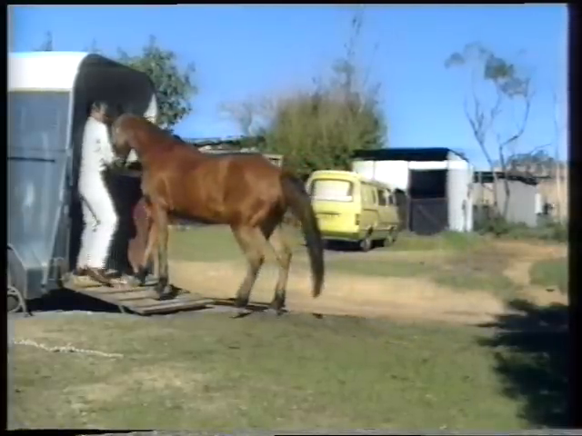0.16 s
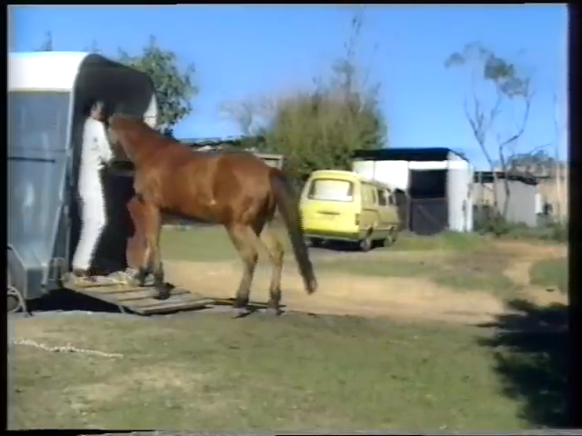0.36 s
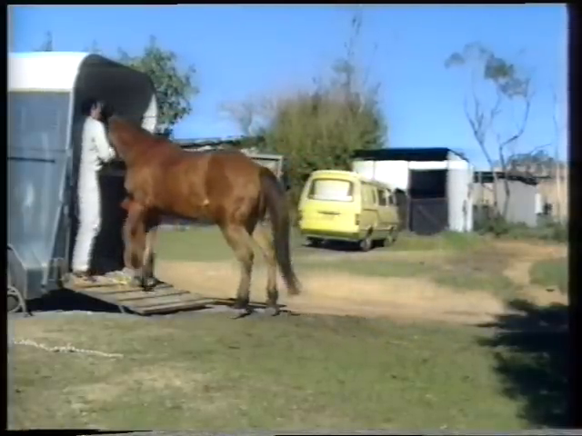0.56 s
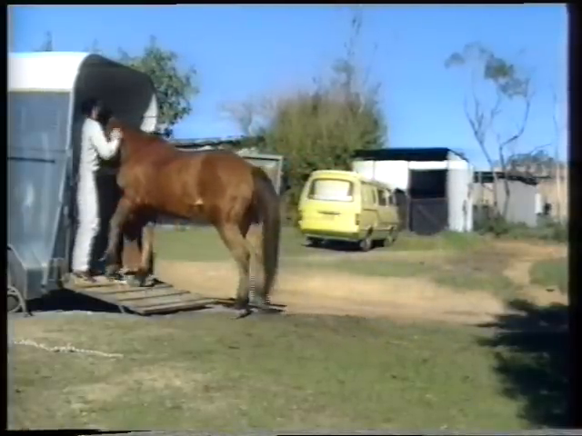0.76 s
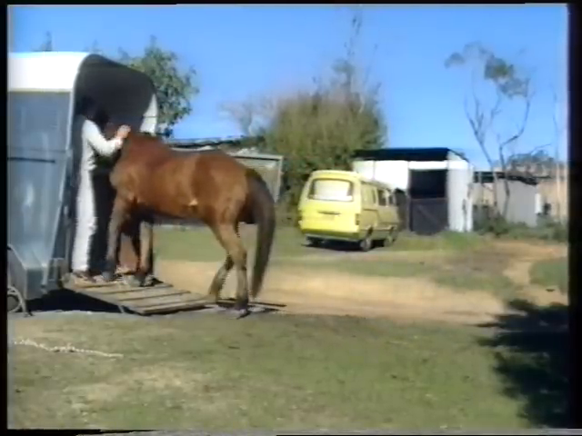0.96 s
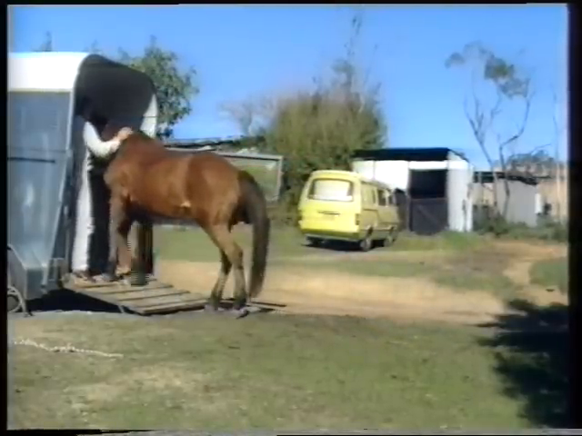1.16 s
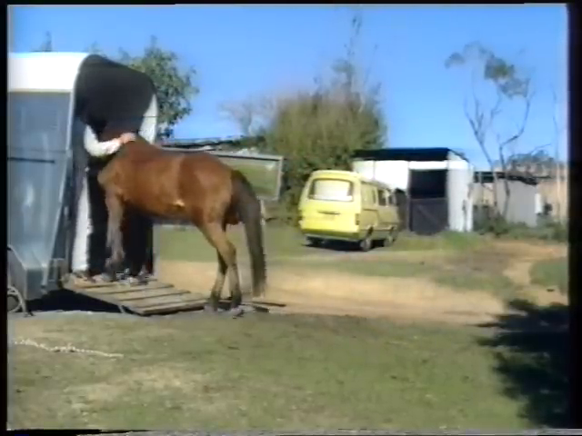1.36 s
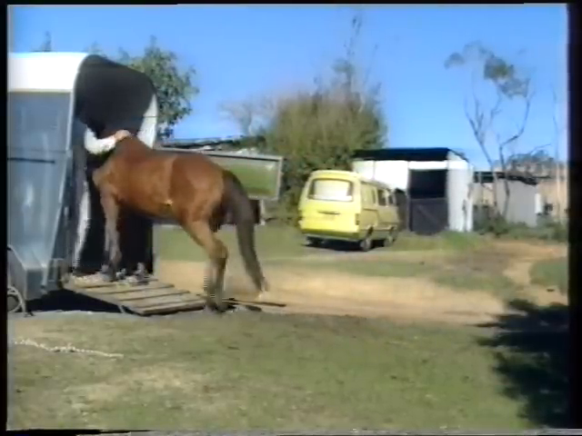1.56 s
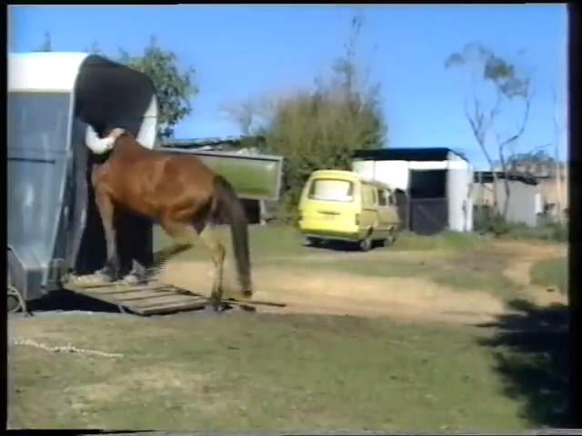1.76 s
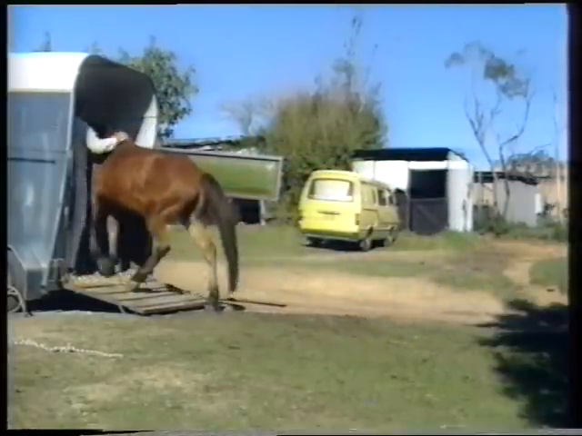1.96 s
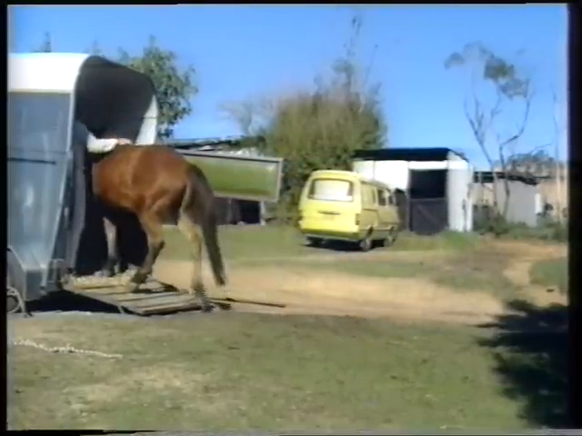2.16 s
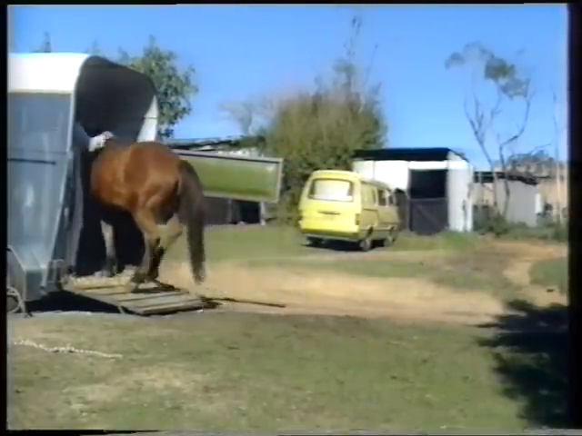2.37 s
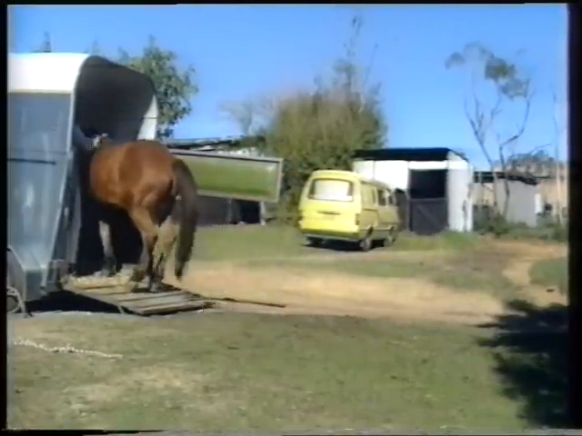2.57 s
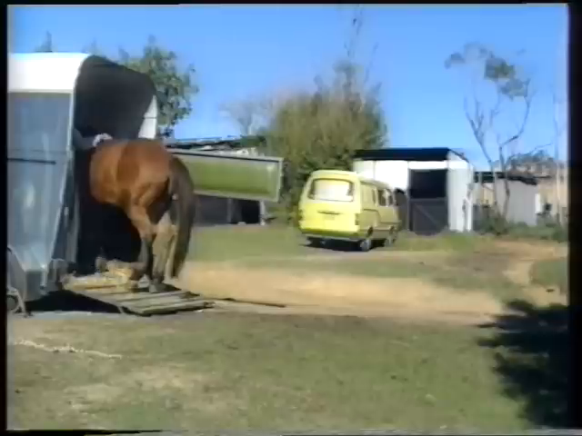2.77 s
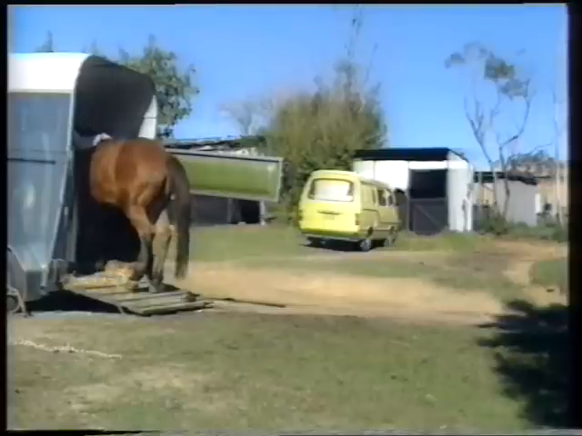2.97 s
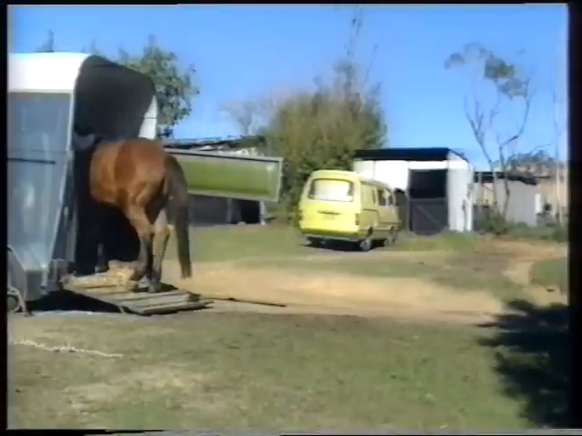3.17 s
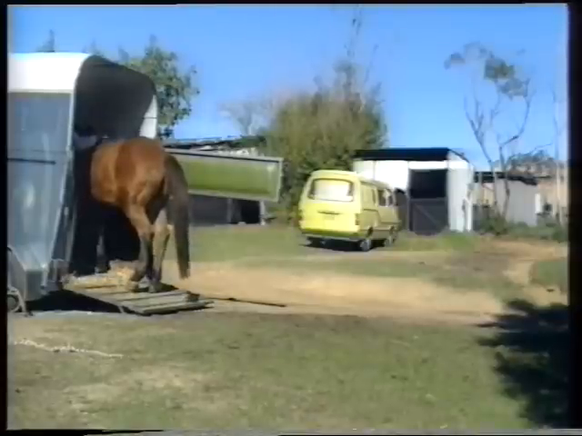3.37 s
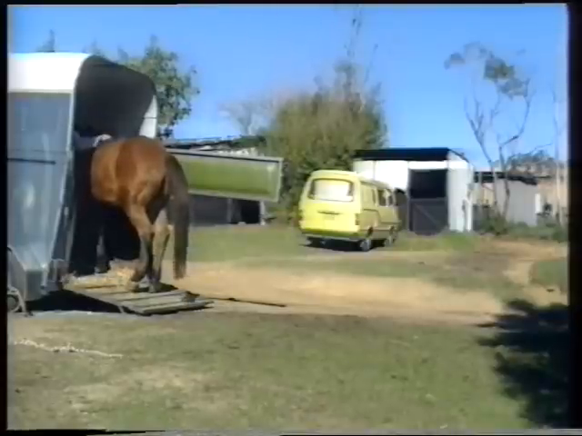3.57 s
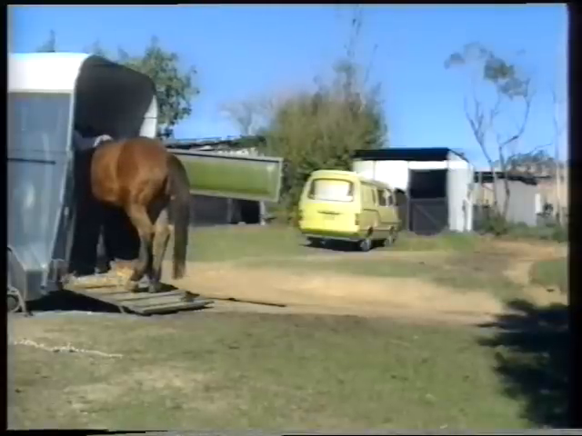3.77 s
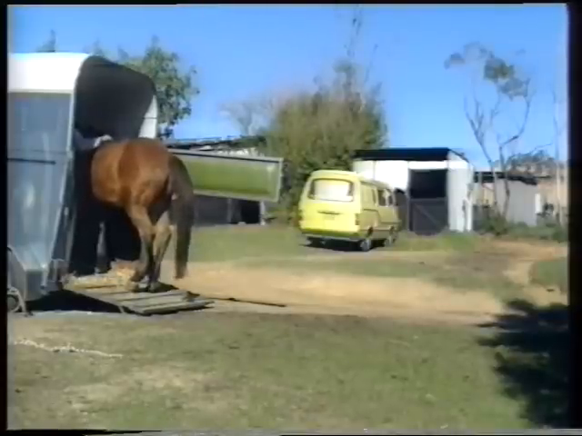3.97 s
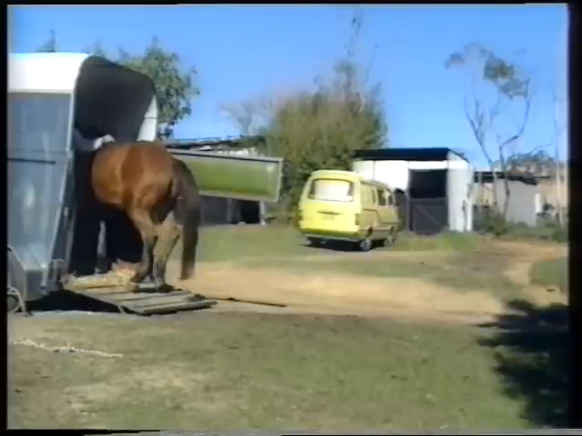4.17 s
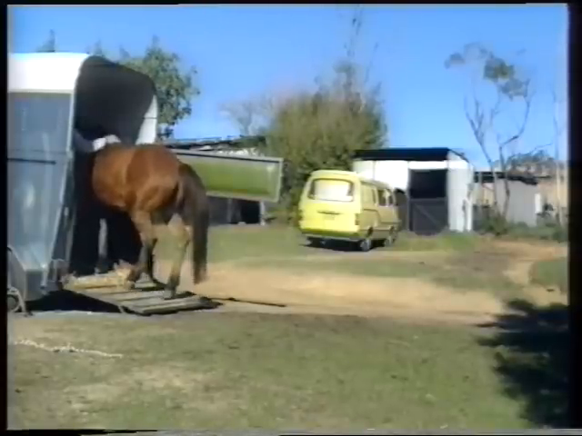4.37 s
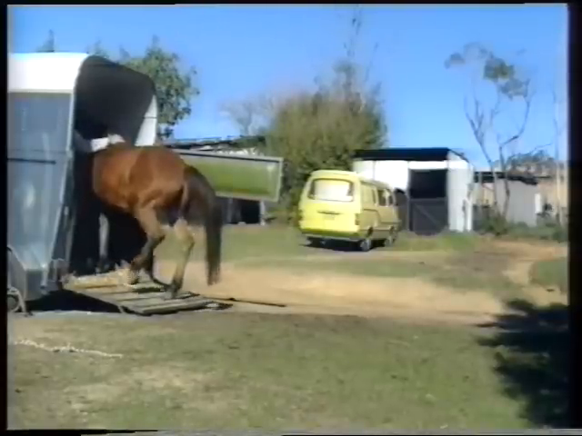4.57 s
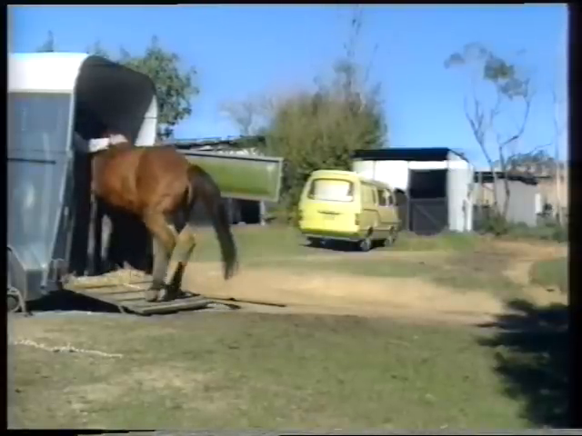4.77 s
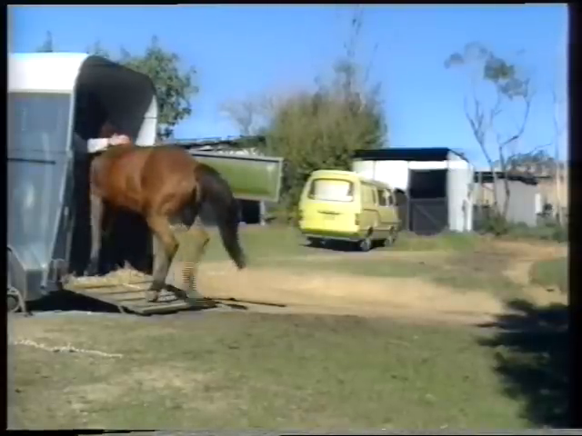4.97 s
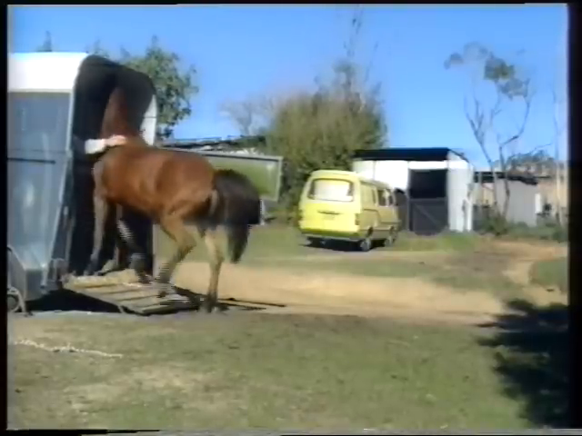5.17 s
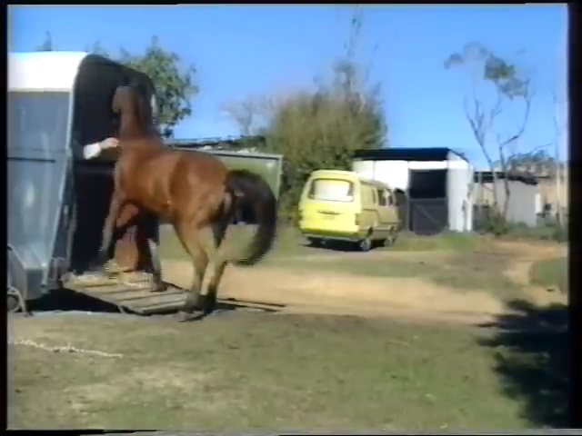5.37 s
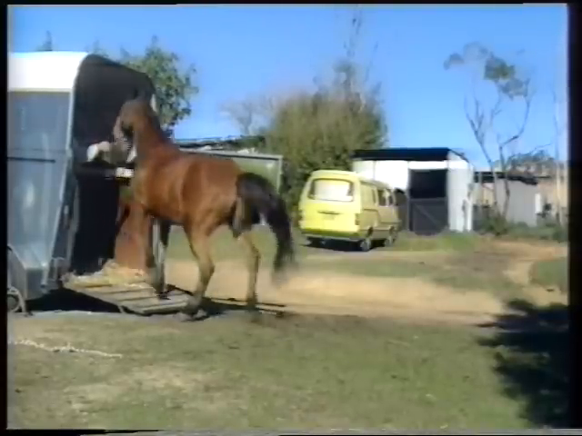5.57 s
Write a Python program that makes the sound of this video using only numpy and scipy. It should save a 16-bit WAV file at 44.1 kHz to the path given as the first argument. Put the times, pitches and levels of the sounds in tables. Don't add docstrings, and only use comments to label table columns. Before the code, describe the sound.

Heavy hoof knocks climb echoing planks into a trailer, fall nearly quiet, then step backward with scuffs and rattling boards through noisy tape sound.

```python
import sys
import numpy as np
from scipy import signal
from scipy.fft import rfft, irfft
from scipy.io import wavfile
from scipy.ndimage import uniform_filter1d

SR = 44100
rng = np.random.default_rng(int(sys.argv[2]) if len(sys.argv) > 2 else 0)


def field_ratio(decibels):
    return 10 ** (np.asarray(decibels, dtype=float) / 20)


def transcribe(signal):
    frames = np.atleast_2d(signal).T
    limited = np.clip(frames, -1, 1)
    pcm = np.round(limited * 32767).astype(np.int16)
    wavfile.write(sys.argv[1], SR, pcm)


N = 247401


def evened(x):
    return x / np.sqrt(np.mean(x ** 2) + 1e-20)


def read(points, hz):
    f, value = np.transpose(points)
    return np.interp(np.log(hz + 1), np.log(f + 1), value)


def add(mix, s, sound):
    part = mix[round(s * SR):][:len(sound)]
    part += sound[:len(part)]


def coloured(x, spectrum, lumps_db=0.):
    hz = np.fft.rfftfreq(len(x), 1 / SR)
    lumps = np.interp(hz, np.arange(600) * 40, rng.standard_normal(600))
    gain = field_ratio(read(spectrum, hz) + lumps_db * lumps)
    return evened(irfft(rfft(x) * gain, len(x)))


def wander(rate_hz):
    slow = signal.butter(2, rate_hz, fs=SR, output="sos")
    return evened(signal.sosfilt(slow, rng.standard_normal(N)))


# f/Hz, level/dB per Hz
YARD_AIR = [(12, -52), (20, -10), (92, 1.5), (224, 2.5), (296, -17), (350, -8), (644, -11), (741, -15),
            (1360, -10), (2510, -20), (11000, -23), (14100, -25), (15300, -17.5)]


def yard():
    return field_ratio(-53 + 0.24 * wander(22)) * coloured(rng.standard_normal(N), YARD_AIR)


# f/Hz, level/dB
HUM = [(25, -71), (50, -62.5), (100, -58), (150, -58.5), (350, -62.5), (450, -79), (600, -77), (650, -68.5),
       (850, -73)]
# f/Hz, level/dB
WHINE = [(15622, -55), (11620, -73.5)]


def electronics():
    t = np.arange(N) / SR
    hum = 0
    for hz, db in HUM:
        hum = hum + field_ratio(db + 3 + 1.5 * wander(4)) * np.sin(2 * np.pi * (hz * t + rng.random()))
    creep = uniform_filter1d((100 * t + .3) % 1, 12) * (2.1 + .8 * wander(30))
    phase = creep + 2.6 * wander(10)
    fade = field_ratio(3.6 * wander(16) + 2.6 * wander(110))
    return hum + fade * sum(field_ratio(db) * np.sin(2 * np.pi * hz * t + phase) for hz, db in WHINE)


# f/Hz, level/dB per Hz
TAPE_HISS = [(18, -43), (30, 0), (143, -5), (177, -9), (242, -24), (2960, -31.5), (14100, -15),
             (15300, -9.5)]


def tape_hiss():
    hiss = field_ratio(-65) * coloured(rng.standard_normal(N), TAPE_HISS)
    return np.outer([1, -1], hiss)


# f/Hz, left minus right level/dB
TILT = [(40, 1.5), (120, 1.9), (350, 1.8), (700, 1.3), (1400, .9), (3000, .5), (6000, .5), (10000, .7),
        (15000, 1.2)]
# f/Hz, left lead/radians
SKEW = [(0, 0), (11600, 0.16), (14800, 0.13), (15600, 0.32), (16500, 0.2)]


def tape_tracks(x):
    hz = np.fft.rfftfreq(N, 1 / SR)
    half = np.array([[.5], [-.5]])
    tilt = field_ratio(half * read(TILT, hz)) * np.exp(1j * half * read(SKEW, hz))
    contact = field_ratio(half * 0.16 * wander(420))
    return contact * irfft(rfft(x) * tilt, N) + tape_hiss()


# f/Hz, level/dB per Hz
BODY = [(24, -37), (40, -39), (97, -5.5), (133, -11.5), (183, -7.5), (219, -2.5), (395, -13), (462, -11.5),
        (580, -16.5), (680, -17.5), (1840, -34), (2020, -36), (3170, -42), (5220, -53), (9000, -57),
        (11700, -58), (19800, -120)]
# t/s, level/dB
SHUFFLE = [(0.0, -24), (0.05, -31.5), (0.44, -51.5), (0.69, -48.5), (0.8, -29), (0.92, -35), (1.81, -45),
           (1.95, -36), (2.23, -33.5), (2.61, -28), (3.06, -46.5), (4.03, -47), (4.22, -41), (4.36, -56),
           (4.78, -27), (5.03, -44.5), (5.26, -27), (5.61, -32)]


def shuffle():
    s, db = np.transpose(SHUFFLE)
    level_db = np.interp(np.arange(N) / SR, s, db - 7.0) + 1.6 * wander(31)
    return field_ratio(level_db) * coloured(rng.standard_normal(N), BODY, 0.74)


def knock(modes, chatter_s):
    t = np.arange(16000) / SR
    ring = 0
    for k, (hz, width, db) in enumerate(modes):
        width = np.clip(width, 6, 150)
        envelope = np.exp(-np.pi * width * t) * (1 - np.exp(-t * hz / 4.8))
        ring += (-1) ** k * field_ratio(db) * width * envelope * np.sin(2 * np.pi * hz * t)
    when, size = rng.random((2, 6))
    contacts = np.zeros(3000)
    contacts[(when * chatter_s * SR).astype(int)] = 0.72 * size - .3
    contacts[0] = 1
    sound = signal.fftconvolve(ring, contacts)
    return sound / abs(sound).max()


# f/Hz, t60/s
BODY_RING = [(60, 1), (120, 0.78), (250, 0.72), (500, 0.47), (1000, 0.43), (2500, 0.13), (8000, 0.18)]


def drumming(boom_db, ring):
    lifted = [(hz, db + boom_db / (1 + (hz / 170) ** 4)) for hz, db in BODY]
    noise = coloured(rng.standard_normal(2 ** 15), lifted, 1.5)
    hz, t, z = signal.stft(noise, SR, nperseg=512, noverlap=384)
    swell = 1 - np.exp(-(t + 0.0072) * np.maximum(hz, 40)[:, None] / 1.5)
    decay = field_ratio(-60 * t / (ring * read(BODY_RING, hz))[:, None])
    tail = signal.istft(z * swell * decay, SR, nperseg=512, noverlap=384)[1]
    onset = np.minimum(np.arange(len(tail)) / 150, 1)
    return tail / np.sqrt(np.mean(tail[:3000] ** 2)) * onset


# f/Hz, level/dB per Hz
CRACK = [(710, -29), (1200, 1), (1810, -6), (2980, -17), (3560, -18), (6040, -27), (9230, -29),
         (15000, -41)]


def crack(t60):
    t = np.arange(9000) / SR
    splinters = field_ratio(3.2 * np.repeat(np.minimum(rng.exponential(1, 100), 3), 90))
    burst = evened(splinters * coloured(rng.standard_normal(len(t)), CRACK, 1.9))
    return burst * field_ratio(-60 * t / t60) * np.minimum(t / 0.00086, 1)


# t/s, blow level/dB, knock f/Hz, drumming level/dB
HEELS = [(0.002, -29, 157, -12.5), (0.059, -23, 215, -35), (0.334, -27.5, 251, -20.5),
         (0.839, -21, 215, -6.5), (1.365, -27, 100, -16.5), (1.394, -23.5, 120, -16.5),
         (1.447, -24, 196, -10.5), (1.47, -31.5, 230, -9), (1.799, -4.5, 144, -21), (1.979, -31, 720, -15),
         (2.073, -34.5, 201, -6.5), (2.19, -19, 90, -17.5), (2.394, -6.5, 120, -13.5),
         (2.45, -13.5, 226, -12.5), (2.519, -20, 259, -13.5), (2.721, -18, 250, -17),
         (3.508, -38.5, 242, -20), (4.194, -13.5, 236, -13.5), (4.369, -26.5, 254, -15),
         (4.919, -23, 421, -11), (5.159, -33, 970, -24), (.22, -37.5, 89, -19), (4.665, -11, 195, -24),
         (5.4, -26, 394, -7), (2.28, -32, 496, -28)]
# t/s, blow level/dB, knock f/Hz, drumming level/dB
TOES = [(1.028, -27.5, 216, -17), (1.6, -36, 640, -16), (2.153, -28, 253, -4), (2.669, -26, 682, -12.5),
        (3.678, -40, 337, -11), (3.898, -37, 165, -16), (4.262, -14.5, 230, -9.5),
        (4.566, -37.5, 211, -6.5), (5.01, -27.5, 407, -17.5), (5.217, -38, 374, -12),
        (5.294, -10.5, 151, -11.5), (5.469, -21.5, 161, -32)]


def light_taps():
    out = np.zeros(N)
    for taps, crack_db in ((HEELS, -71), (TOES, -46)):
        for s, blow_db, hz, drum_db in taps:
            over_db = blow_db + 25
            modes = [(hz, 28, 0), (1.263 * hz, 45, -8), (1.685 * hz, 70, -20)]
            ring = 0.83 - 0.0095 * over_db
            add(out, s, field_ratio(blow_db - 4.5) * knock(modes, 0.025))
            add(out, s, field_ratio(blow_db + drum_db) * drumming(-3.5 * np.log2(hz / 180), ring))
            add(out, s, field_ratio(crack_db + 0.88 * over_db) * crack(0.33))
    return out


# t/s, level/dB, f/Hz, t60/s
TICKS = [(.1, -52, 1600, .06), (.14, -50, 1200, .06), (.783, -32, 1010, 0.11), (.868, -48, 3300, .15),
         (.99, -49, 1500, .08), (1.36, -37.5, 1800, 0.035), (1.445, -39, 1150, .12),
         (1.467, -38, 1900, 0.18), (1.597, -42, 900, .1), (1.811, -36, 1200, .1), (1.892, -46, 1800, .08),
         (2.378, -18, 790, 0.094), (2.42, -45, 2790, 0.13), (2.449, -35, 900, 0.082),
         (2.452, -49, 3200, .2), (2.515, -42.5, 1600, 0.1), (2.667, -45, 1500, .1),
         (2.708, -41, 1400, 0.13), (2.706, -43.5, 2400, 0.2), (3.671, -52, 1450, 0.083),
         (3.914, -52, 1500, .06), (4.168, -28, 1400, 0.073), (4.19, -32.5, 1200, 0.074),
         (4.573, -45.5, 900, .15), (4.626, -31.5, 3200, 0.068), (4.7, -41, 1300, .2),
         (4.924, -36, 1710, 0.054), (5.155, -44, 1400, .06), (5.217, -38, 900, .12), (5.24, -33, 1400, .1),
         (5.26, -30, 2300, .05), (5.308, -33.5, 1800, 0.087), (5.355, -29.5, 780, .4),
         (5.471, -40, 1600, 0.091), (5.581, -24.5, 3500, 0.023), (.003, -39, 500, .1),
         (.155, -43, 1100, .05), (.17, -37, 380, 0.093), (.752, -32.5, 2500, .04), (1.968, -37, 800, 0.17),
         (2.2, -31.5, 280, .35), (2.677, -51, 5500, .15), (4.645, -15.5, 250, 0.27), (5.35, -29, 420, 0.26),
         (5.085, -54, 6000, 0.087), (4.261, -27, 750, .12), (1.025, -47.5, 3000, .04),
         (4.852, -46, 8000, .3), (4.71, -50.5, 3000, .4), (.77, -25, 150, .4)]


def ticks():
    out, t = np.zeros(N), np.arange(12288) / SR
    for s, db, hz, t60 in TICKS:
        colour = [(hz / 4, -24), (hz / 1.5, -4), (hz, 0), (1.5 * hz, -8), (2.5 * hz, -26), (5 * hz, -70)]
        burst = coloured(rng.standard_normal(len(t)), colour, 2.4)
        add(out, s, field_ratio(db - 60 * t / t60) * np.minimum(t / 0.0014, 1) * burst)
    return out


# t/s, blow level/dB, f/Hz, width/Hz
CLINKS = [(0.153, -32, 412, 52), (1.474, -39, 1300, 49), (2.08, -48.5, 2340, 100), (2.165, -28, 659, 43),
          (0.815, -24, 92, 14), (2.712, -36, 714, 60), (.762, -11, 302, 61), (1.027, -52, 3300, 170),
          (1.36, -42, 1850, 190), (0.0038, -29.5, 108, 16.5), (2.8, -36.5, 690, 58), (1.3, -31, 90, 35),
          (5.345, -24.5, 420, 37), (2.52, -26, 740, 54), (4.639, -20.5, 1154, 94), (4.65, -5.5, 272, 36),
          (5.6, -30.5, 960, 60), (5.296, -21.5, 1120, 120)]


def clinks():
    out = np.zeros(N)
    for s, blow_db, hz, width in CLINKS:
        add(out, s, field_ratio(blow_db) * knock([(hz, width, 0), (hz, width, -5)], 0.044))
    return out


# f/Hz, level/dB per Hz
GRIT = [(1500, -8), (3500, -6), (5000, -3), (7000, -2.5), (10000, -5), (13000, -8.5), (15500, -24)]
# f/Hz, level/dB per Hz
RASP = [(1500, -3), (2300, 3), (3300, -6), (4500, -9.5), (6000, -32)]
# f/Hz, level/dB per Hz
SCRAPE = [(350, -18), (700, 5.5), (1000, 9), (1500, -1), (2000, -7), (3000, -65)]


def rubbing(t):
    grains = field_ratio(2.6 * np.repeat(np.minimum(rng.exponential(1, 300), 3), 110))
    drive = grains * rng.standard_normal((3, len(grains)))
    layers = [coloured(g, colour, 2.9) for g, colour in zip(drive, (GRIT, RASP, SCRAPE))]
    return np.array(layers)[:, :len(t)]


def strokes(events):
    out, t = np.zeros(N), np.arange(-.15, .55, 1 / SR)
    for s, db, gritty_db, rise, fall in events:
        mix_db = db + np.array([[-5 + 1.29 * gritty_db], [0], [5.5 - 0.89 * gritty_db]])
        pressure_db = -21.5 * np.maximum(-t / rise, t / fall) ** 1.255
        add(out, s + t[0], (field_ratio(mix_db + pressure_db) * rubbing(t)).sum(0))
    return out


# t/s of most pressure, level/dB, grittiness/dB, rise/s, fall/s
SCUFFS = [(0.175, -57, -1, 0.14, 0.045), (0.229, -62.5, 10.5, 0.066, 0.058), (.338, -54.5, 1, .04, 0.043),
          (.58, -63.5, 5, 0.11, 0.033), (.714, -69.5, 13.5, 0.08, 0.096), (.85, -47, -1.5, 0.098, 0.14),
          (1.082, -53.5, 3, 0.22, 0.07), (1.361, -48, 4.5, 0.0093, 0.068), (1.472, -46, -5.5, 0.018, 0.1),
          (1.62, -62, -11, 0.1, 0.023), (1.977, -60, 7.5, 0.11, 0.15), (2.16, -43.5, -2, 0.014, 0.1),
          (2.672, -46, -3, 0.016, 0.11), (2.766, -57.5, 3, .08, .07), (2.894, -70, 9.5, 0.025, .02),
          (3.65, -63, -6.5, 0.022, 0.035), (4.14, -56, 6, 0.085, 0.049), (4.276, -35, 1.5, 0.054, 0.031),
          (4.577, -68, 11, 0.022, 0.078), (4.87, -62, 16.5, 0.071, 0.11), (4.925, -45, 4, 0.014, 0.064),
          (5.015, -48, 5.5, 0.051, 0.055), (5.169, -49, -11, 0.02, 0.048), (5.252, -39, 4.5, 0.11, 0.083)]


def scuffs():
    return strokes(SCUFFS)


# t/s of most pressure, level/dB, grittiness/dB,
# rise/s, fall/s
SLIDES = [(1.31, -68.5, 12.5, 0.15, 0.17), (1.71, -62.5, 7.5, 0.073, 0.17),
          (1.878, -62.5, 11.5, 0.28, 0.15), (4.79, -63.5, 10.5, 0.15, 0.031), (5.09, -61, 12, 0.046, 0.049),
          (5.429, -49.5, 0, 0.31, 0.12), (5.54, -60.5, 10.5, 0.11, 0.17), (.9, -52, -2, 0.057, 0.074),
          (1.19, -61, -5.5, 0.075, 0.13), (1.69, -62, -9.5, 0.051, 0.045), (2.469, -51.5, -9, 0.059, 0.1),
          (3.13, -62, 3, .08, 0.18), (2.62, -60, -9, 0.044, .04), (4.25, -37, 1.5, 0.03, .045),
          (4.813, -61, 13, .012, .015), (1.0, -54.5, -9, .04, .04), (.79, -46, -9, .03, .05)]


def slides():
    return strokes(SLIDES)


# t/s, half length/s, depth/0-1
MID_DIPS = [
    (.746, 0.0028, 0.5),
    (4.163, 0.0047, 0.64),
]


def mid_dips(x):
    t = np.arange(N) / SR
    dip = sum(np.clip(depth, 0, 1) * np.exp(-((t - s) / length) ** 4) for s, length, depth in MID_DIPS)
    mid_band = uniform_filter1d(x, size=3, axis=1) - uniform_filter1d(x, size=41, axis=1)
    return x - dip * mid_band


# t/s, blow level/dB, boom level/dB, crack level/dB, drumming level/dB
HEAVY = [
    (0.752, -9.5, -11, -32.5, -2),
    (1.769, -7, -14, -23, 0.5),
    (2.37, -9, -22, -32, -4.5),
    (4.172, -17, -7, -23, 8.5),
    (4.624, -7.5, -7.5, -26, -3),
    (5.261, -6.5, -38, -41, -9.5),
    (5.577, -6, -27, -24, -2.5),
]
# f/Hz, width/Hz, level/dB
PLANKS_IN = [
    [(102, 8.7, -30), (215, 25, -7), (281, 50, 6.5), (420, 46, -15), (823, 220, -4.5), (1150, 170, -10),
     (1870, 190, -23.5)],
    [(153, 31, -8), (178.5, 7.5, 8), (227.8, 4.2, 3), (264.7, 13, 3.5), (500, 28, -15.5), (653, 36, -20),
     (864, 120, -6.5), (1080, 19, -15), (1270, 31, -31), (1770, 180, -30)],
    [(109.4, 10, 3.5), (143, 27, 2), (221, 29, -4.5), (294, 17, -2.5), (378, 56, -11.5), (500, 39, -13),
     (577, 27, -13), (763, 70, -9.5), (995, 38, -21), (1170, 45, -24)],
]
# f/Hz, width/Hz, level/dB
PLANKS_OUT = [
    [(151, 4.8, 5), (234, 6.5, -2), (273, 48, -28), (358, 13, -11.5), (464, 65, -27), (538, 15, -6),
     (653, 22, -17), (950, 100, -14.5), (1190, 79, -33)],
    [(151, 17, -20), (267.2, 11, 4), (360, 17, -32), (480.5, 22.4, 1), (574, 48, -13), (1067, 20.7, -20),
     (1170, 54, -34), (1670, 63, -37)],
    [(96.4, 14, 11.5), (145.8, 9, 11), (250, 18, 2.5), (330, 35, -17), (468, 104, 4), (660, 71, -3.5),
     (837, 60, -4.5), (1047, 91, -7.5), (1580, 160, -18)],
    [(264, 26, 1.5), (310, 21, 1.5), (418, 55, -4), (506, 40, 0.5), (677, 71, -9), (740, 29, -15),
     (888, 53, -15.5), (1400, 130, -28)],
]


def full_weight_steps():
    out = np.zeros(N)
    for (s, blow_db, boom_db, crack_db, drum_db), plank in zip(HEAVY, PLANKS_IN + PLANKS_OUT):
        add(out, s, field_ratio(blow_db + 3.0) * knock(plank, 0.01399))
        add(out, s, field_ratio(blow_db + drum_db - 9) * drumming(boom_db + 12.0, 0.79))
        add(out, s, field_ratio(blow_db + crack_db + 8.5) * crack(0.19))
    return out


# level/dB against the blow, fall/dB per s
RATTLE = [(-51, 75), (-37, 113), (-28.5, 64.5)]


def rattle():
    out, t = np.zeros(N), np.arange(-.15, .55, 1 / SR)
    under_db, fall = np.transpose(RATTLE)[:, :, None]
    for s, blow_db, *_ in HEAVY:
        level = np.clip(t / 0.027, 0, 1) * field_ratio(blow_db + under_db - fall * t)
        add(out, s + t[0], (level * rubbing(t)).sum(0))
    return out


def ducked(dry):
    power_db = 10 * np.log10(abs(uniform_filter1d(dry[0] ** 2, 2000)) + 1e-12)
    fall = np.arange(N) * 21 / SR
    held_db = np.maximum.accumulate(power_db + fall) - fall
    over_db = np.maximum(held_db + 37, 0)
    return dry / field_ratio(0.085 * uniform_filter1d(over_db, 1500, origin=749))


def scene():
    horse = light_taps() + full_weight_steps() + scuffs() + slides() + shuffle()
    loose_parts = ticks() + clinks() + rattle()
    return np.tile(yard() + horse + loose_parts, (2, 1))


def roll_off(x):
    return signal.sosfilt(signal.butter(12, 16100, fs=SR, output="sos"), x)


def record(dry):
    thin = signal.sosfilt(signal.butter(2, 62, "high", fs=SR, output="sos"), ducked(dry))
    limited = 0.61 * np.tanh(1.197 * thin / 0.67) + electronics()
    tracks = tape_tracks(mid_dips(limited))
    band_edge = signal.firwin(1501, 15750, window=("kaiser", 8), fs=SR)
    edged = signal.oaconvolve(tracks, band_edge[None], "same")
    return roll_off(edged)


dry = scene()
out = record(dry)
transcribe(out)
```